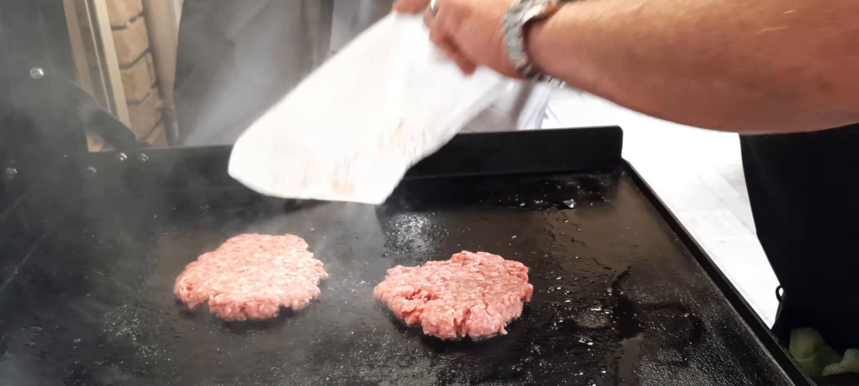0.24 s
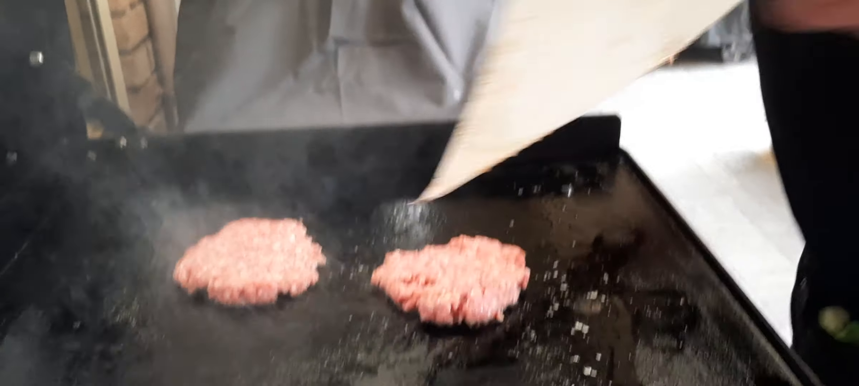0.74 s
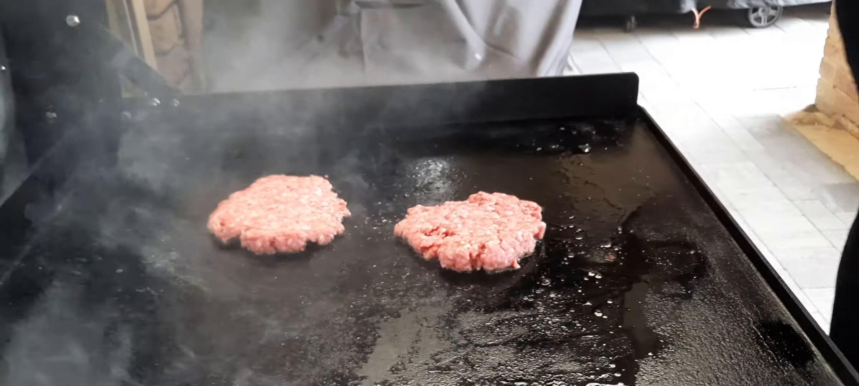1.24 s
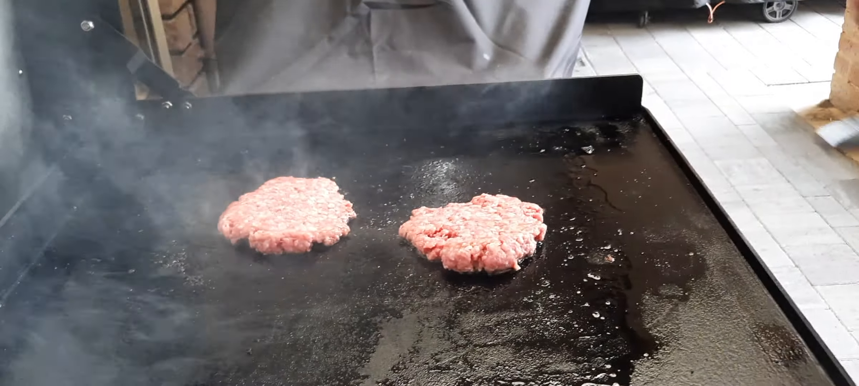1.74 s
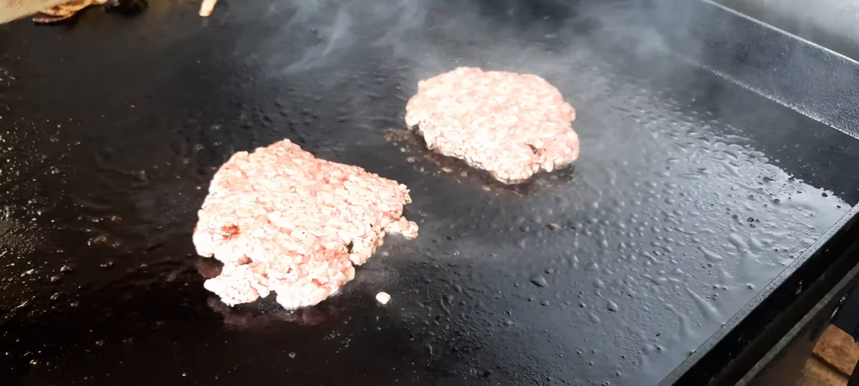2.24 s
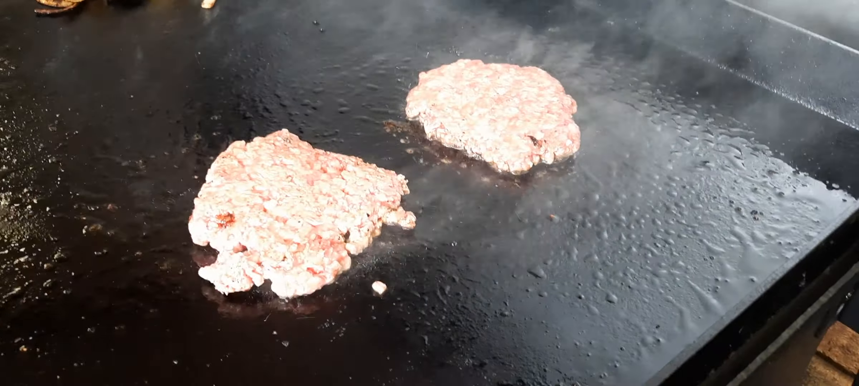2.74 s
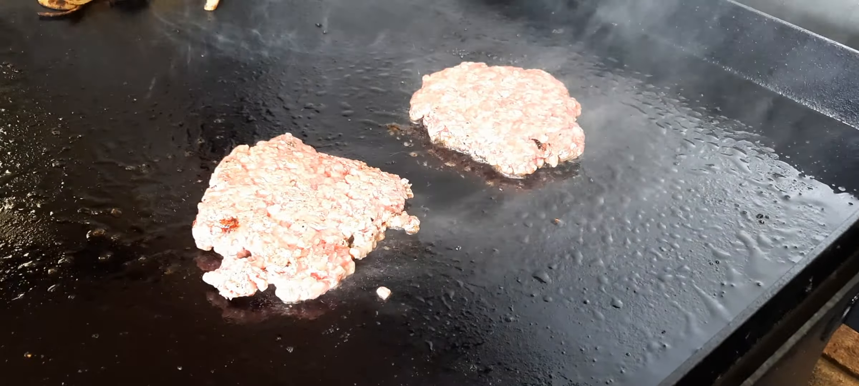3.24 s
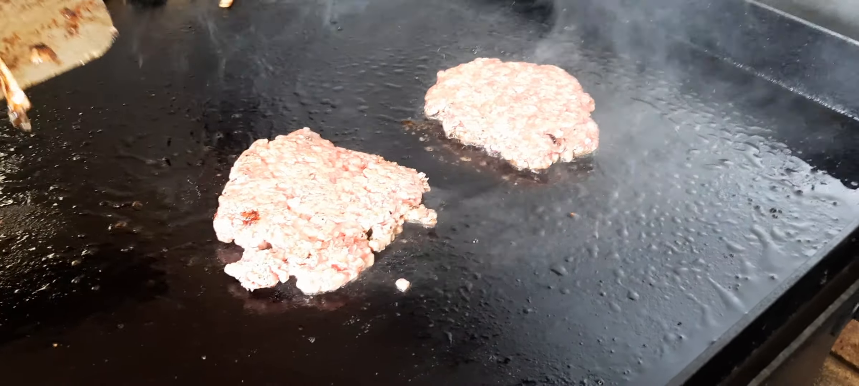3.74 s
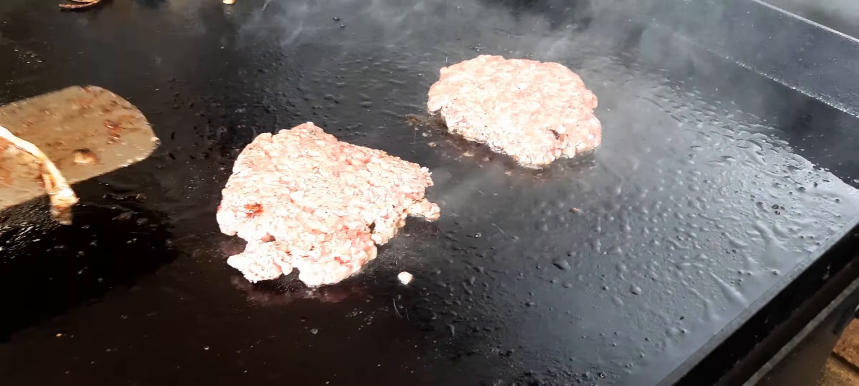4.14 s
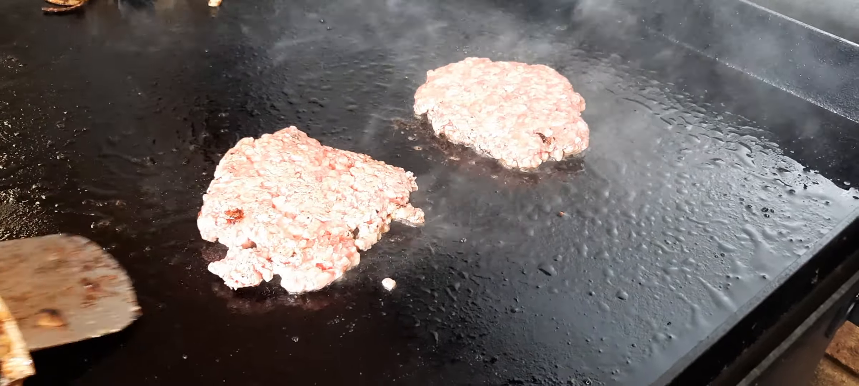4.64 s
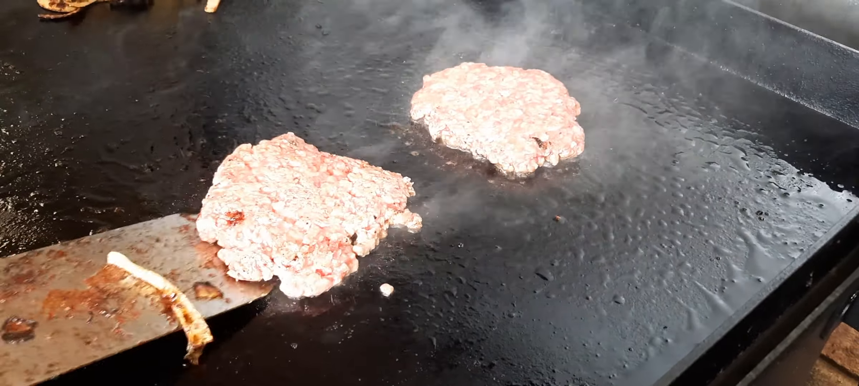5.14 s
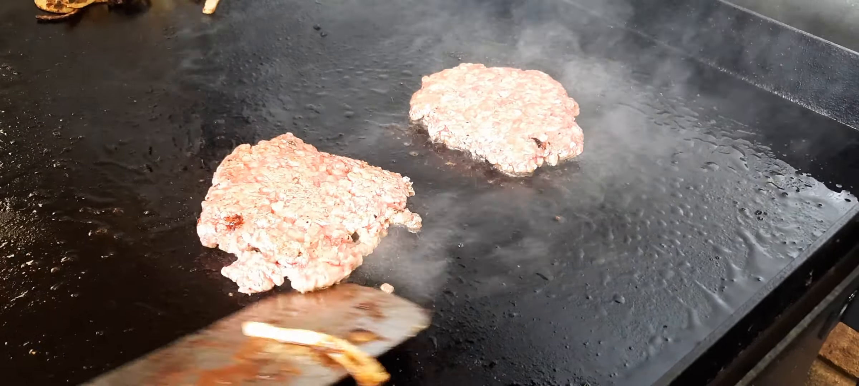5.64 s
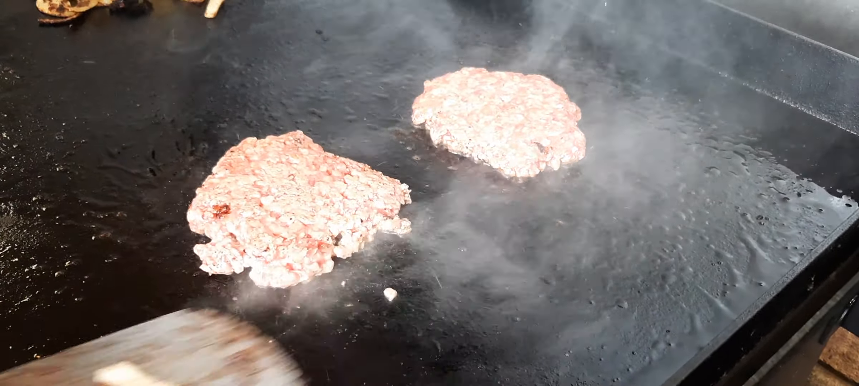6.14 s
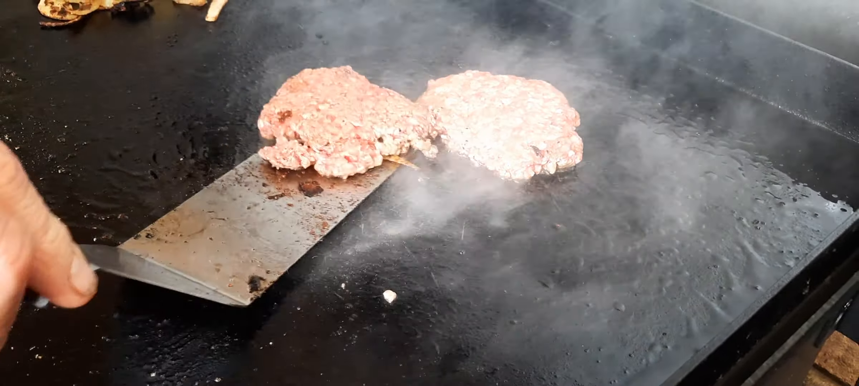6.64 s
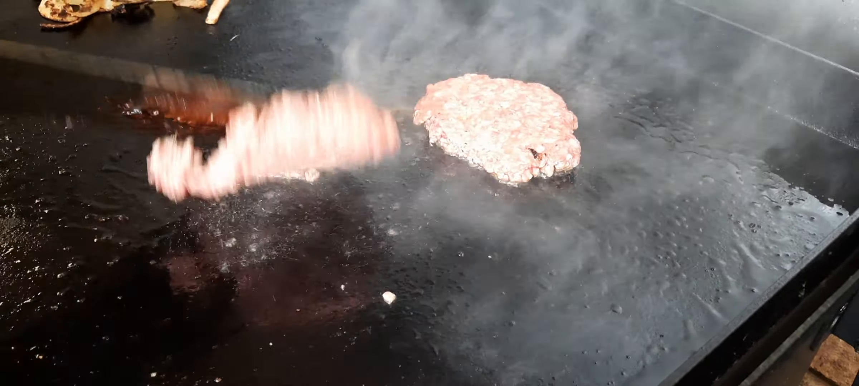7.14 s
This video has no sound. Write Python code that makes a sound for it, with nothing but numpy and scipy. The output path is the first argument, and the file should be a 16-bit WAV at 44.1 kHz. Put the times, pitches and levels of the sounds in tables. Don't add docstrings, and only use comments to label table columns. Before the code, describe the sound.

Two meat patties sizzle loudly on a hot griddle, fat crackling and popping, with a steel spatula scraping harshly beneath one near the end.

```python
import sys
import numpy as np
from scipy import signal
from scipy.fft import rfft, irfft, next_fast_len
from scipy.io import wavfile
from scipy.ndimage import uniform_filter1d

SR = 44100
rng = np.random.default_rng(int(sys.argv[2]) if len(sys.argv) > 2 else 0)


def dump_mix(stems):
    frames = np.atleast_2d(stems).T
    limited = np.clip(frames, -1, 1)
    pcm = np.round(limited * 32767).astype(np.int16)
    wavfile.write(sys.argv[1], SR, pcm)


def volts_from_db(level):
    exponent = np.asarray(level, float) / 20
    return 10 ** exponent


N = 325899


def evened(x):
    return x / np.sqrt(np.mean(x ** 2) + 1e-20)


def curve(rows):
    times, *columns = np.transpose(rows)
    return [np.interp(np.arange(N) / SR, times, column) for column in columns]


def swells(rows):
    t = np.arange(N) / SR
    return sum(db * np.exp(-((t - s) / half) ** 2) for s, half, db in rows)


def changed(far, near):
    change_at_s, change_s = 2.3, 0.042
    progress = (np.arange(N) / SR - change_at_s) / change_s + .5
    return far + (near - far) * np.clip(progress, 0, 1)


def sides(lean_db):
    return volts_from_db(np.array([np.minimum(lean_db, 0), np.minimum(-lean_db, 0)]))


def drift(low_hz, top_hz):
    hz = np.geomspace(low_hz, top_hz, num=40)
    t = np.arange(0, N + 64, 64) / SR
    slow = np.sin(2 * np.pi * (hz * t[:, None] + rng.random(len(hz)))).sum(1)
    return np.interp(np.arange(N) / SR, t, evened(slow))


def bursts(per_s, spread_db):
    size = volts_from_db(spread_db * np.minimum(rng.exponential(1, N), 5.4))
    return -size * (rng.random(N) < per_s / SR)


def resonate(x, hz, width):
    turn = np.exp(2j * np.pi * np.cumsum(hz * np.ones(len(x))) / SR)
    r = np.exp(-np.pi * width / SR)
    return 2 * (turn * signal.lfilter([1 - r], [1, -r], x / turn)).real


def steep(x, hz, width):
    return resonate(resonate(x, hz, width), hz, width)


def causal(db):
    log_gain = np.log(volts_from_db(np.r_[db, db[-2:0:-1]]))
    return np.fft.ifft(np.exp(np.conj(signal.hilbert(log_gain)))).real[:1024]


def whitened(x):
    z = rfft(x, next_fast_len(N))
    return irfft(z / np.sqrt(uniform_filter1d(abs(z) ** 2, size=4000)))[:, :N]


def add(mix, s, sound):
    part = mix[:, round(s * SR):][:, :sound.shape[1]]
    part += sound[:, :part.shape[1]]


def heard(x):
    # (frequency [Hz], left level [dB], right level [dB])
    fizz_far = [(60, -40, -36), (400, -36, -24), (700, -26.5, -17.5), (1200, -21.5, -17),
                (2100, -17.6, -11), (3200, -16.3, -10.3), (4000, -14, -8), (4800, -10.2, -3.8),
                (5900, -6.2, 3), (7500, -14.7, -.8), (8900, -19, .8), (10200, -16, -2.5),
                (12500, -13.5, .8), (15600, -21.5, 0)]
    # (frequency [Hz], left level [dB], right level [dB])
    fizz_near = [(60, -43, -39), (400, -35, -21), (700, -22.5, -14.5), (1200, -19.5, -14.3),
                 (2100, -15.3, -8.7), (3200, -15.3, -10.8), (4000, -12.5, -8), (4800, -9.8, -2.1),
                 (5900, -7.4, 1), (7500, -15.8, -3), (8900, -21.5, -1.2), (10200, -18, -4),
                 (13000, -16.2, .2), (15600, -25.5, 1.4)]
    hz, nearness = np.fft.rfftfreq(2048, 1 / SR), changed(0, 1)
    out = np.zeros((2, N))
    for colour, share in ((fizz_far, 1 - nearness), (fizz_near, nearness)):
        f, *levels = np.transpose(colour)
        taps = np.array([causal(np.interp(np.log(hz + 1), np.log(f), db)) for db in levels])
        out += share * signal.oaconvolve(x, taps, axes=1)[:, :N]
    return out


def sizzle(count=18):
    # (time [s], level [dB])
    frying = [(0.0, -34), (1.01, -32.5), (1.5, -34.5), (1.67, -33.5), (1.97, -34.5), (2.18, -33.5),
              (2.39, -34.5), (4.43, -34.5), (4.6, -35.5), (5.18, -32), (5.3, -34), (6.07, -32.5),
              (6.49, -33.5), (6.535, -30), (6.77, -32), (6.87, -34), (7.22, -33.5), (7.28, -32.5)]
    # (time [s], half length [s], level [dB])
    lean_swells = [
        (.7, 0.99, 1),
        (6.2, 1.1, 1.9),
    ]
    # (time [s], half length [s], level [dB])
    spray_lulls = [
        (1.5, 0.14, -2),
        (2.03, 0.12, -3.5),
        (4.95, 0.16, -1),
        (5.15, 0.091, 0.5),
        (6.65, 0.12, -0.5),
    ]
    out, t = np.zeros((2, N)), np.arange(32) / SR
    gusts = volts_from_db(.9 * drift(3, 30) + .8 * drift(30, 300))
    place = rng.permutation(np.arange(count) + .5) / count
    lags = np.round(-5 + 4.2 * np.log(place / (1 - place))).astype(int)
    for ring_hz, left_lag in zip(np.geomspace(2500, 15500, num=count), lags):
        spread_db = 2.3 + 2.0 * (ring_hz / 15000) ** 3
        clicks = bursts(640 * gusts * volts_from_db(2.5 * drift(4, 40)), spread_db)
        ring = 0.65 * np.sin(2 * np.pi * ring_hz * t) * np.exp(-t * ring_hz / 0.99)
        ring[0] = 1
        hiss = 0.56 * gusts * rng.standard_normal(N)
        spot = evened(np.convolve(clicks, ring)[:N]) + hiss
        spot += sum(0.34 * rng.normal() * np.roll(spot, int(rng.uniform(20, 300))) for _ in range(2))
        for side, lag in enumerate((left_lag, 0)):
            echo = 0.41 * rng.normal() * np.roll(spot, int(rng.uniform(10, 120)))
            out[side] += np.roll(spot, lag) + echo
    level_db = curve(frying)[0]
    fizz = heard(whitened(out))
    usual_db, spray_per_db = -32, -.5
    high_pass = signal.firwin(41, 9800, pass_zero=False, fs=SR)
    spray = signal.oaconvolve(fizz, high_pass[None], "same", axes=1)
    fizz += spray * (volts_from_db(spray_per_db * (level_db - usual_db) + swells(spray_lulls)) - 1)
    left_db = -0.68 + swells(lean_swells)
    return fizz / np.std(fizz.mean(0)) * volts_from_db(level_db + 6.0) * volts_from_db(np.array([left_db, np.zeros(N)]))


def burner():
    # (frequency [Hz], width [Hz], level [dB])
    firebox = [(159.3, 33, 5.5), (253, 70, -1), (299, 75, 4), (346.4, 53, -2), (548, 33, -11),
               (1003, 66, -4.5)]
    # (time [s], half length [s], level [dB])
    flares = [
        (.95, 0.39, 5),
        (1.6, 0.14, 4),
        (2.25, 0.048, 6),
        (3.1, 0.12, -8),
        (4.3, .3, 1.5),
        (6.98, .06, -9),
    ]
    flame = rng.standard_normal((2, N)) * volts_from_db(2.9 * drift(5, 40) + 0.75 * drift(1.517, 5.1))
    flame[0] = .9 * flame[1] + .45 * flame[0]
    roar = sum(volts_from_db(db) * np.array([steep(v, hz, w) for v in flame]) for hz, w, db in firebox)
    level_db = changed(-51.5, -55) + swells(flares)
    return volts_from_db(level_db) * evened(roar) * sides(changed(-13, -20))


def rumble():
    # (time [s], half length [s], level [dB])
    air_gusts = [
        (1.15, 0.17, 10),
        (3.95, .1, 5.0),
        (4.45, .1, 9),
        (6.65, 0.22, -9),
        (7.33, 0.092, 14),
    ]
    air = rng.standard_normal((2, N)) * volts_from_db(1.0 * drift(0.8, 1.8))
    low = np.array([steep(v, 63, 61) for v in air])
    return volts_from_db(changed(-65.5, -69) + swells(air_gusts)) * evened(low) * sides(-6.5)[:, None]


def pops():
    # (time [s], peak level [dB])
    large_pops = [(1.218, -29), (1.789, -31), (1.889, -31), (2.0018, -22), (2.188, -21.5), (2.2375, -26),
                  (2.539, -57), (3.305, -54), (3.635, -36), (4.215, -35), (4.27, -27), (4.364, -26),
                  (4.457, -38), (4.831, -28), (5.027, -27.5), (5.197, -29), (5.864, -26), (6.186, -26),
                  (6.539, -31)]
    t = np.arange(-40, 300) / SR
    suction = -np.exp(-(t / .00017) ** 2)
    overshoot = .21 * np.exp(-((t - .0013) / .0008) ** 2)
    pulse = suction + overshoot
    out = np.zeros((2, N))
    for s, db in large_pops:
        add(out, s + t[0], volts_from_db(db) * np.outer(sides(-21), pulse))
    patter = -np.convolve(bursts(per_s=150, spread_db=2.5), pulse)[:N]
    return out + volts_from_db(-47.0) * np.outer(sides(-14.5), patter)


def cracks():
    # (time [s], peak level [dB])
    spits = [(0.619, -11), (0.8854, -13), (1.1495, -10.5), (1.242, -12), (1.928, -17), (1.9894, -10),
             (2.156, -24), (2.1863, -12.5), (2.9074, -9.5), (3.4342, -14), (3.4434, -9), (3.6315, -15),
             (3.7402, -35), (4.0304, -11), (4.2464, -14), (4.5314, -15), (4.6044, -9), (4.659, -23),
             (4.783, -9.5), (4.929, -14), (4.9584, -15), (5.117, -13), (5.685, -14), (5.8472, -10),
             (6.1733, -13), (6.362, -11), (6.538, -16), (6.554, -12), (6.586, -13), (7.191, -15)]
    clicks = np.zeros((2, N))
    for s, db in spits:
        add(clicks, s + 0.0012, -volts_from_db(db + 13.0) * np.array([[.7], [1]]))
    return heard(clicks + 0.19 * np.roll(clicks, 55, axis=1))


def ticks():
    # (time [s], peak level [dB], left-right difference [dB], pitch [Hz])
    taps_of_steel = [
        (2.1568, -22.5, 3, 2000),
        (4.364, -27, 8, 1500),
        (4.6, -26.5, -15, 1300),
        (5.315, -37, -5, 1190),
        (7.112, -35, -6, 1300),
        (7.117, -31, -1, 1200),
    ]
    out, t = np.zeros((2, N)), np.arange(300) / SR
    for s, db, lean_db, hz in taps_of_steel:
        swing = np.sin(2 * np.pi * hz * t) * np.exp(-t * hz / 1.3)
        add(out, s, volts_from_db(db) * np.outer(sides(lean_db), swing))
    return out


def splats():
    # (time [s], peak level [dB], left-right difference [dB], first frequency [Hz])
    drops = [
        (2.1584, -30, 19, 506),
        (7.1462, -24.5, -30, 404),
    ]
    last_hz, fade_s = 58, 0.0073
    out, t = np.zeros((2, N)), np.arange(3000) / SR
    for s, db, lean_db, first_hz in drops:
        hz = last_hz + (first_hz - last_hz) * np.exp(-t / 0.0021)
        swing = np.sin(2 * np.pi * np.cumsum(hz) / SR) * np.exp(-t / fade_s)
        add(out, s, volts_from_db(db) * np.outer(sides(lean_db), swing))
    return out


def spatula():
    # (frequency [Hz], level [dB])
    steel_modes = [(305, 5), (545, 3.5), (840, -4), (1090, -14), (1370, -9), (1810, -2), (2310, -14)]
    # (start [s], length [s], steel ringing [dB], rasp [dB], resonance the rasp climbs to [Hz])
    strokes = [
        (4.692, .12, -53.5, -45, 2600),
        (5.72, 0.355, -59, -43.5, 2600),
        (6.431, 0.38, -58, -33, 3900),
        (7.107, 0.041, -74, -41.5, 2600),
        (6.2, .24, -59.5, -56, 2400),
    ]
    push_share, push_db, strike = .27, -19, 60
    rasp_sag_db, ring_sag_db, lift_s = -5.5, -4.5, .012
    climb_share, climb_s = 0.7, 0.08
    out = np.zeros((2, N))
    for s, length, ring_db, rasp_db, top_hz in strokes:
        t = np.arange(0, length, 1 / SR)
        push = push_db * np.clip(1 - t / (push_share * length), 0, 1)
        slide = np.clip((t / length - push_share) / (1 - push_share), 0, 1)
        lift = np.clip((length - t) / lift_s, 0, 1)
        hz = top_hz * (1 - climb_share * np.exp(-t / climb_s))
        blow = strike * (np.arange(len(t)) == int(push_share * len(t)))
        shake = rng.standard_normal(SR)[:len(t)] + blow
        ring = sum(volts_from_db(db) * steep(shake, f, 36) for f, db in steel_modes)
        ring_gain = lift * volts_from_db(ring_db + 7.5 + push + ring_sag_db * slide)
        add(out, s, ring_gain * evened(ring) * sides(-14.0)[:, None])
        for side, lean_db in enumerate((0, 1.5)):
            noise = rng.standard_normal(SR)[:len(t)]
            size = rng.exponential(1, SR)[:len(t)]
            grit = noise * volts_from_db(3 * np.minimum(size, 5))
            rasp = evened(steep(grit, hz, 1700)) + 1.2 * evened(steep(grit, 5300, 3000))
            rasp_gain = lift * volts_from_db(rasp_db + lean_db + push + rasp_sag_db * np.sqrt(slide))
            add(out[side:side + 1], s, rasp_gain * evened(rasp)[None])
    return out


def scene():
    return sizzle() + burner() + rumble() + pops() + cracks() + ticks() + splats() + spatula()


def weak_bands_dropped(x, below_db):
    window = np.sqrt(signal.windows.hann(2048, sym=False))
    z = signal.stft(x, window=window, nperseg=2048, noverlap=1024)[2]
    power = abs(z[:, :1024]) ** 2
    bands = power.reshape(2, 128, 8, -1).mean(2)
    masked = bands < uniform_filter1d(bands, size=29, axis=1) * volts_from_db(-2 * below_db)[:, None, None]
    masked |= np.roll(masked, -1, axis=2)
    masked[:, :12] = False
    z[:, :1024] *= 1 - .99 * np.repeat(masked, 8, axis=1)
    return signal.istft(z, window=window, nperseg=2048, noverlap=1024)[1][:, :N]


def top_cut(x):
    return signal.sosfilt(signal.butter(12, 17050, fs=SR, output="sos"), x)


def record(dry):
    # (time [s], depth [dB], recovery [s])
    ducks = [(1.155, 1.5, .03), (1.8, 2.5, 0.057), (2.24, 6, 0.013), (2.54, 2, 0.05), (2.79, 2, 0.036),
             (3.41, 1.5, .02), (3.965, 2, 0.016), (4.255, 5, 0.007), (4.48, 2.5, .03), (4.66, 2, 0.022),
             (5.55, 2, 0.039), (5.865, 5, 0.008), (6.19, 3, 0.068), (6.82, 2.5, .04), (1.995, 4.5, .06),
             (7.145, 5, 0.05)]
    fall_s = .007
    t, duck_db = np.arange(N) / SR, np.zeros(N)
    for s, db, recovery in ducks:
        fall = np.clip((t - s) / fall_s + 1, 0, 1)
        duck_db += db * fall * np.exp(-np.maximum(t - s, 0) / recovery)
    ducked = signal.lfilter(*signal.butter(2, 40, "high", fs=SR), dry * volts_from_db(-duck_db))
    audible = weak_bands_dropped(ducked, below_db=np.array([5.6, 9.8]))
    low_pass = signal.firwin(2001, 15750, window=("kaiser", 9), fs=SR)
    limited = signal.oaconvolve(audible, low_pass[None], "same", axes=1)
    return top_cut(limited)


dry = scene()
out = record(dry)
dump_mix(out)
```